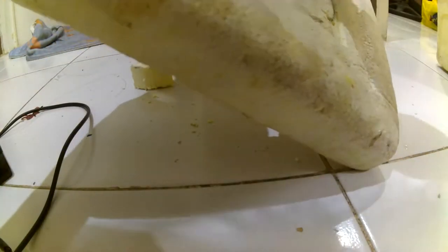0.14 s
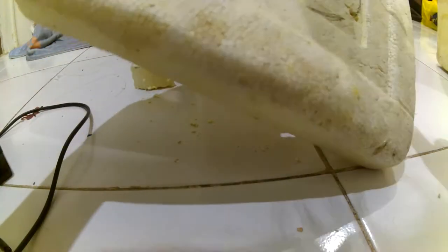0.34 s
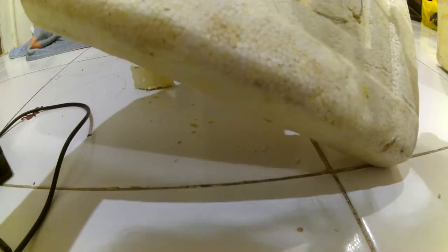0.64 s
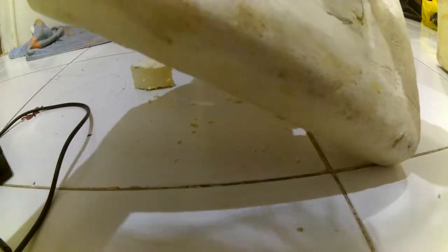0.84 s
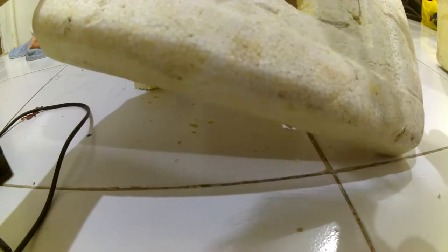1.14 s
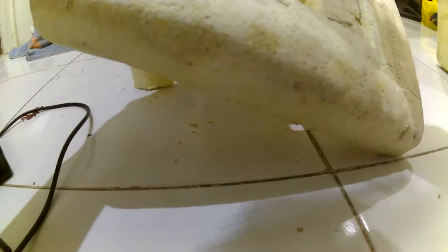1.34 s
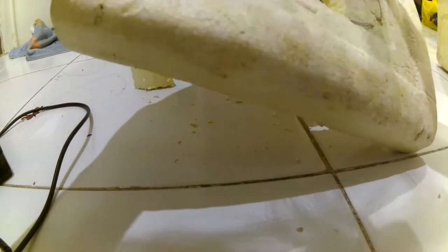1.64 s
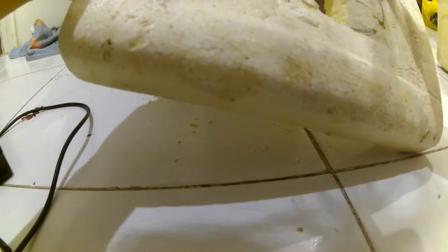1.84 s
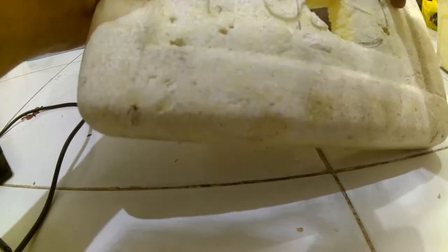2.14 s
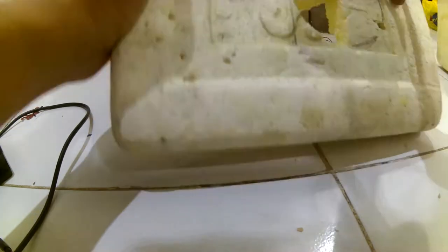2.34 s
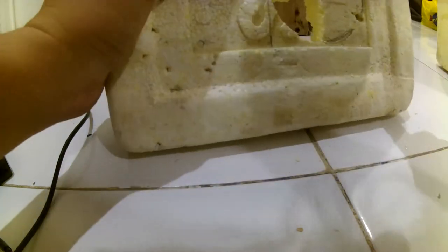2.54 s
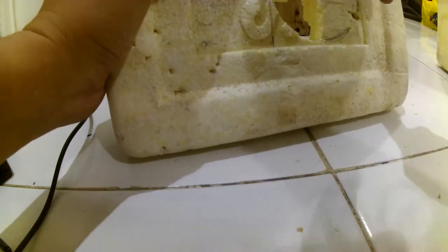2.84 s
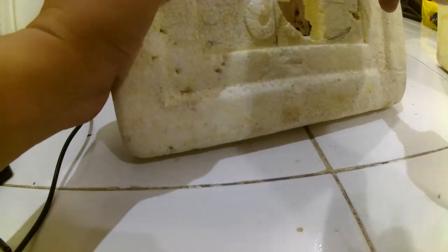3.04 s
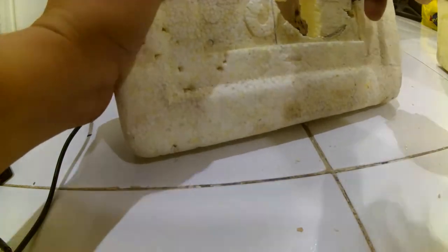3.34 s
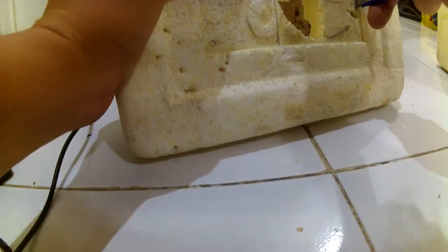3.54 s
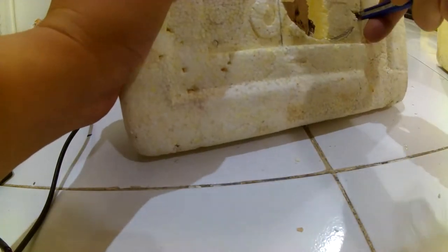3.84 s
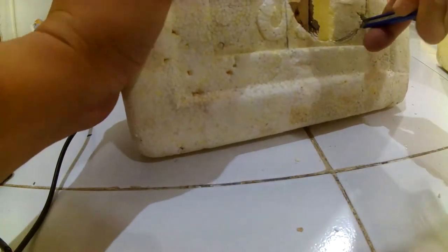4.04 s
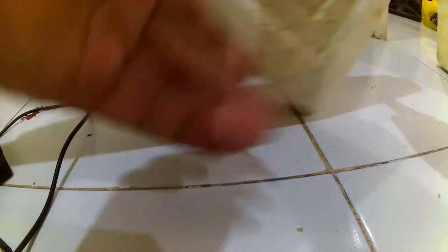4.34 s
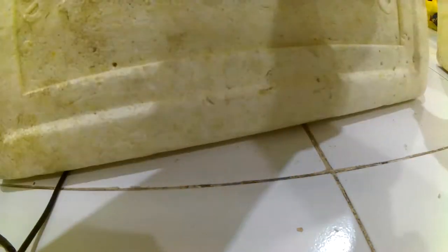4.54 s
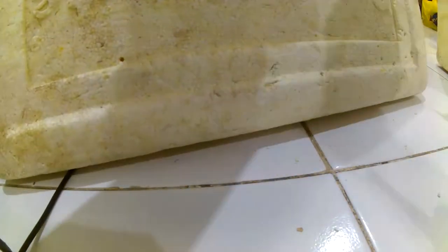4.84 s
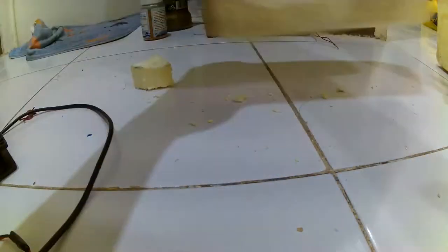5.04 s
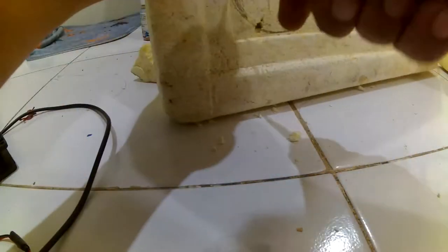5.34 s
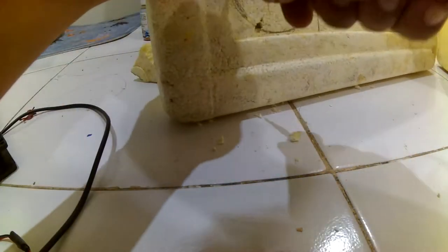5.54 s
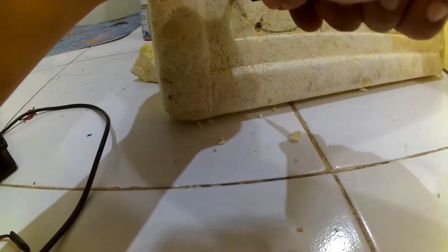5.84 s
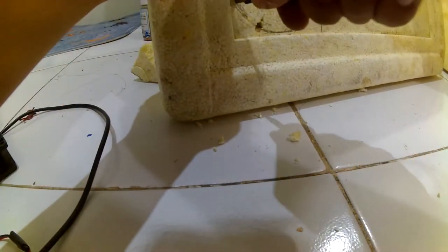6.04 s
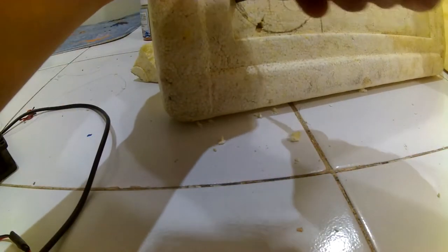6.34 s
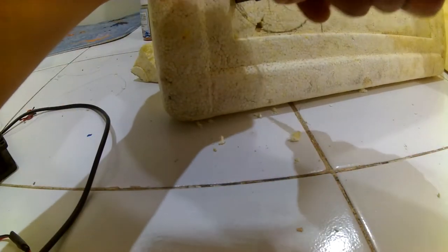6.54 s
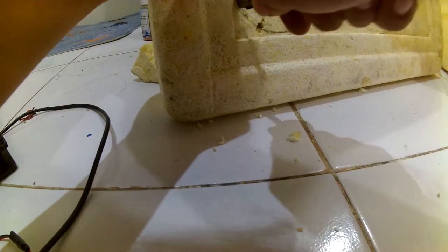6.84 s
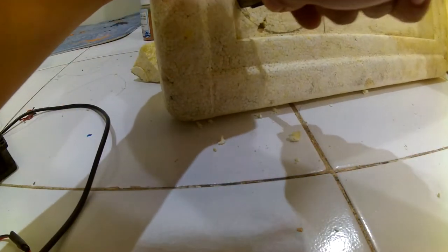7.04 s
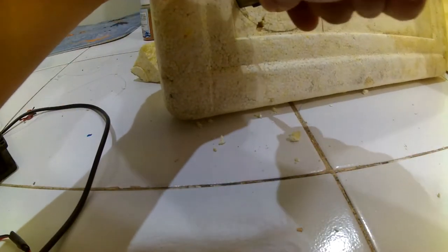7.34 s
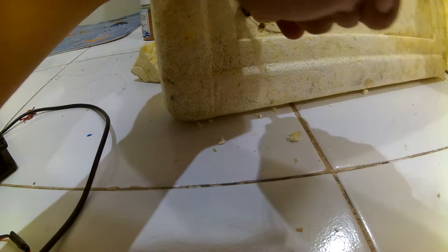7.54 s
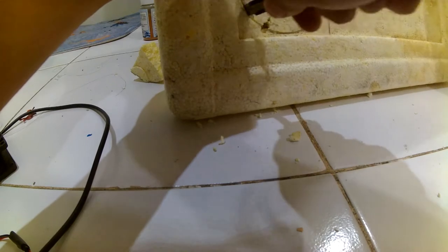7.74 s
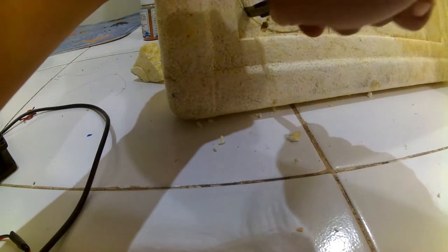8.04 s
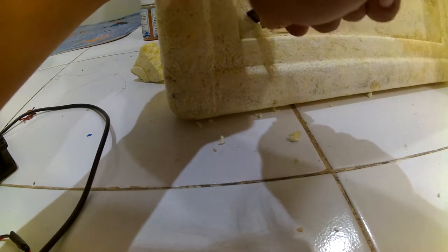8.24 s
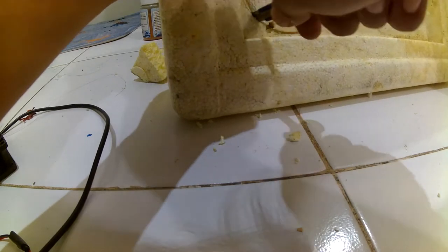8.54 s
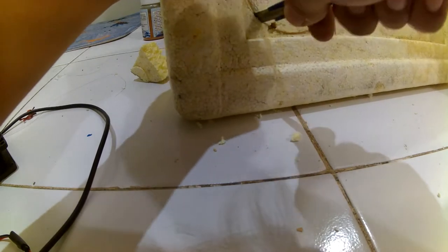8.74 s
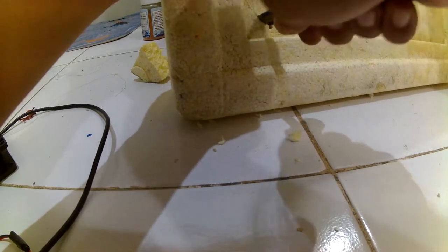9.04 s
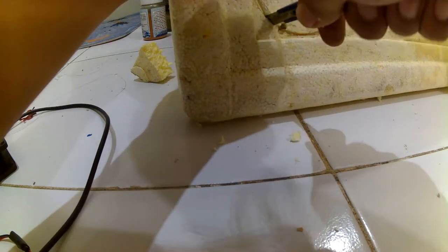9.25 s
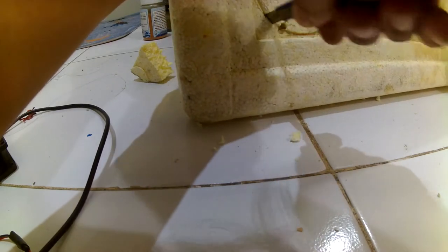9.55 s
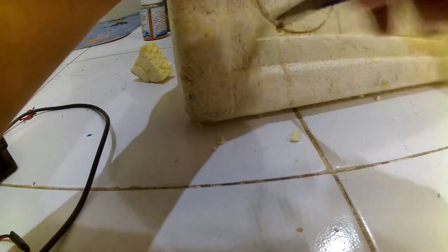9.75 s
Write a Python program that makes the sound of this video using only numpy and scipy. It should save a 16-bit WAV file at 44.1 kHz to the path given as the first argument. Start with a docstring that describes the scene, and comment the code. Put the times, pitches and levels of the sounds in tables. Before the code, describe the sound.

A knife picks and scrapes at a foam lid with dry snaps, squeaks and knocks, then saws in long, droning, raspy strokes.

```python
"""A knife blade cuts a polystyrene box lid on a tiled floor, close by. First it picks at the foam: bursts of noise
are snapping beads, dense grains are short scrapes, wavering partials are thin squeaks, and struck resonances
are knocks as the lid is turned. From 5.82 s it saws in long strokes that drive the lid's resonances, so that it
drones, rumbles and thumps. Behind the picking lie light rubbing, room tone and a faint cricket; behind the
sawing, a shuddering lid over a soft hiss."""
import sys
import numpy as np
from scipy import signal
from scipy.fft import rfft, irfft, next_fast_len
from scipy.io import wavfile

SR = 44100
rng = np.random.default_rng(int(sys.argv[2]) if len(sys.argv) > 2 else 0)


def unload_audio(sound):
    """Save the sound as a 16-bit wav file, at the path given as the first command line argument."""
    columns = np.transpose(np.atleast_2d(sound))
    # keep every value between -1 and 1, then stretch to whole-number steps
    steps = np.round(np.clip(columns, -1, 1) * 32767)
    wavfile.write(sys.argv[1], SR, steps.astype(np.int16))


N = 437031
TIME = np.arange(N) / SR
SAWING_FROM_S = 5.82


# loudest beads of foam to snap [t/s, level/dB, treble tilt against mids/dB]
BEAD_SNAPS = [(0.025, -22.5, 16), (0.0621, -11, 7.5), (0.099, -28.5, -10), (0.195, -27, 1),
              (0.2036, -19.5, 3), (0.2671, -4.5, -8.5), (0.2723, -15, -4), (0.699, -28, -11),
              (0.7167, -27, -12), (0.7866, -13.5, 6), (0.872, -26, 8), (1.173, -32, 13), (1.245, -34, 5),
              (1.3305, -24.5, -3.5), (1.4246, -10, 29), (1.494, -13, 62), (1.6049, -22.5, 0),
              (1.612, -23.5, -1), (1.7315, -27.5, -17), (1.7901, -23, -3), (1.9307, -11.5, 12),
              (2.0066, -27.5, -5), (2.012, -26, 1), (2.0148, -24.5, 7), (2.171, -31, -14),
              (2.2407, -26, 25), (2.3165, -21.5, 54), (2.3226, -27, 43), (2.4482, -24, 5),
              (2.6186, -25.5, -15), (2.648, -25, -4), (2.702, -30, -13), (2.737, -27.5, -4),
              (2.8777, -34, -11), (2.895, -15, -1), (2.904, -23, -3), (2.9293, -25, 0),
              (2.9885, -11.5, 1.5), (3.0674, -24, 7), (3.1215, -26, -7), (3.2497, -21.5, 1.5),
              (3.2615, -30, 6), (3.4195, -21.5, -2), (3.4436, -27, 4), (3.4649, -17, 3), (3.573, -27, 6),
              (3.647, -24.5, 1), (3.789, -32, 9), (3.9669, -25, 2), (4.0299, -19, 5), (4.035, -16.5, 11),
              (4.066, -25.5, -7), (4.104, -32, 11), (4.1186, -9.5, 12.5), (4.161, -26, 6),
              (4.239, -13.5, 1.5), (4.4012, -9, 40), (4.4235, -23, 10), (4.7396, -13, 25),
              (4.7705, -16, 46), (4.7753, -14.5, -11), (4.7951, -26.5, -22), (4.856, -29, 10),
              (4.8756, -32, -2), (5.0115, -33, -9), (5.1718, -12.5, 16), (5.567, -30, -14), (5.707, -42, 0),
              (5.7235, -10.5, 3.5), (8.0565, -19.5, 2), (9.049, -30.5, -11), (9.6915, -22, 23),
              (9.6985, -27, -3), (9.8895, -22.5, -27)]
# tone of a breaking bead [f/Hz, gain/dB]
SNAP_COLOUR = [(59, -56), (100, -12.5), (424, -4), (1030, 9.5), (2040, 7.5), (2470, 0), (2990, 6),
               (3620, -5.5), (4290, 0.5), (6290, -12), (7140, -10), (9020, -16), (12400, -17), (15000, -22),
               (16000, -10)]


def snaps(tail_s=0.0073, tail_db=-19, rise_db=-21):
    """A snap has a faint noisy rise, bursts for about a millisecond, then a short tail."""
    out = np.zeros(N)
    lead, burst_s, rise_s = 256, 0.0007, 0.0014  # lead: samples of rise before the burst
    t = np.arange(-lead, 2048) / SR
    before = amp(rise_db) * np.exp(-np.abs(t) / rise_s)
    after = np.exp(-np.abs(t) / burst_s) + amp(tail_db) * np.exp(-np.abs(t) / tail_s)
    for start, db, bright_db in list(BEAD_SNAPS) + small_snaps():
        burst = rng.standard_normal(len(t)) * np.where(t < 0, before, after)
        burst[lead] += 3 * rng.choice([-1, 1])  # the click of the break itself
        sound = colour(burst, SNAP_COLOUR, bright_db)
        first_3_ms = sound[lead:lead + 130]
        add(out, start + t[0], sound / np.std(first_3_ms) * amp(db))
    return out


# short pushes of the blade [start t/s, end t/s, level before trim and arch/dB, treble tilt before treble_db/dB]
PUSHES = [(0.122, 0.162, -36, 8), (0.236, 0.274, -28.5, 9), (0.611, 0.621, -38.5, -6),
          (0.644, 0.659, -37.5, 1), (0.735, 0.747, -30.5, 3), (0.905, 0.937, -27.5, 12),
          (1.214, 1.265, -42, -1), (1.464, 1.494, -34.5, 6), (1.539, 1.548, -24.5, 0),
          (1.731, 1.758, -31.5, 7), (1.815, 1.839, -38, 5), (1.954, 1.965, -24, 3.5),
          (2.032, 2.048, -40, 4), (2.19, 2.211, -31, 2.5), (2.413, 2.454, -31.5, -5),
          (2.671, 2.677, -27.5, 4), (2.693, 2.704, -26, 2), (2.756, 2.789, -28.0, 5),
          (2.833, 2.906, -28.5, 1), (2.924, 2.941, -32, 2), (2.977, 2.989, -27, -2), (3.012, 3.023, -21, 9),
          (3.147, 3.173, -22, 5), (3.179, 3.202, -29, 4), (3.279, 3.321, -31, 3), (3.368, 3.421, -28, 8.5),
          (3.473, 3.502, -29.5, 9), (3.567, 3.605, -27.0, 7), (3.661, 3.68, -26.5, 9),
          (3.728, 3.753, -23.5, 10.5), (3.805, 3.822, -27.5, 6), (3.875, 3.899, -26, 8),
          (3.947, 4.003, -34, 12), (4.02, 4.036, -33.5, 1), (4.049, 4.079, -30.5, 7),
          (4.216, 4.236, -21.5, 10), (4.271, 4.279, -33, -5), (4.322, 4.342, -32, 2),
          (4.558, 4.577, -29.5, 5), (4.672, 4.689, -29.5, -5.5), (4.711, 4.714, -27, 5),
          (4.771, 4.775, -24.5, 11), (5.302, 5.309, -34.5, -2), (5.511, 5.528, -29.5, 13),
          (5.55, 5.579, -35.5, 7), (5.605, 5.625, -29, 20), (5.657, 5.701, -29, 8), (5.709, 5.725, -31, -4),
          (5.763, 5.773, -36, 3), (5.795, 5.819, -36, 4), (9.732, 9.734, -24.5, 1),
          (9.801, 9.803, -21.5, 10), (9.861, 9.867, -30, 10)]
# tone of tearing cell walls [f/Hz, gain/dB]
SCRAPE_COLOUR = [(88, -38), (150, -18), (649, -1.5), (1020, 7), (1350, 3), (1630, 0), (1900, 0.5),
                 (2500, -4.5), (2920, 4), (3220, -0.5), (5150, -6), (6200, -2.5), (7100, -0.5), (8700, -6),
                 (9650, -11), (10600, -8), (13400, -8.5), (14700, -20), (16000, -9)]


def scrapes(rise_s=0.015, fall_s=0.0058, judder_db=1.44, arch_db=6, peak_share=0.78, trim_db=-0.5, treble_db=1.5):
    """Each push tears a dense run of cell walls, swelling as the blade gathers speed."""
    out = np.zeros(N)
    for start, end, db, bright_db in PUSHES:
        speed = swell(start, end, rise_s, fall_s)
        n = len(speed)
        tearing = scatter(grains(n, rate=9000, scatter_db=1.0), decay_s=0.0031)
        tearing = tearing * amp(judder_db * walk(n, rate=376))
        sound = unit(colour(tearing, SCRAPE_COLOUR, bright_db + treble_db))
        level = amp(db + trim_db + arch_db * arch(n, peak_share))
        add(out, start - rise_s / 4, sound * speed * level)
    return out


def small_snaps(count=3, reach_s=0.024, lead_db=-13.5, spread_db=2, bright_db=-2.5, bright_spread_db=8):
    """Each push loosens a few small beads that give way at random around it, louder for harder pushes."""
    rows = []
    for start, end, db, _ in PUSHES:
        times = rng.uniform(start - reach_s, end + reach_s, count)
        size, bright = rng.standard_normal((2, count))
        levels_db = db + lead_db + spread_db * size
        rows += zip(times, levels_db, bright_db + bright_spread_db * bright)
    return rows


# even stick-slip of the blade [start t/s, end t/s, first nominal f/Hz, last nominal f/Hz, level/dB,
# step per further partial/dB, mid-way rise of pitch/share]
STICK_SLIPS = [(0.915, 0.967, 1560, 1560, -37, -9, .22), (0.996, 1.063, 1510, 1490, -42, -2, .025),
               (1.114, 1.137, 1600, 1580, -45, -2, .015), (1.975, 2.01, 8100, 7850, -44, -40, 0),
               (3.68, 3.702, 2170, 2100, -37, 0, .01), (3.755, 3.79, 1890, 1870, -42, -4, 0),
               (3.798, 3.829, 1965, 1980, -37, -1, .02), (3.897, 3.944, 1620, 1900, -37.5, -7, .085),
               (4.005, 4.03, 1700, 1880, -40, -1, .02), (4.313, 4.398, 1300, 1340, -41, -8, 0),
               (4.877, 4.917, 8200, 8100, -46, -40, 0), (5.222, 5.334, 1780, 1980, -44.5, -1, .04),
               (5.425, 5.5, 7950, 7700, -48, -40, .02), (6.004, 6.152, 560, 560, -48, -20, -.05),
               (7.014, 7.12, 1750, 1720, -50, -19, 0), (7.08, 7.217, 1340, 1330, -45, -30, .015),
               (7.478, 7.606, 1310, 1410, -43, -24, .015), (9.19, 9.46, 668, 648, -45, -26, 0)]
# the blade favours partials near one resonance [f/Hz, gain/dB]
SQUEAK_COLOUR = [(2000, 4), (2700, 3), (3800, 10.5), (5200, -4), (8000, 7)]


def squeaks(loose_jitter=0.012, pressed_jitter=0.025, waver=0.008):
    """Regular stick-slip gives a thin, wavering stack of partials whose pitch follows the speed of the blade."""
    out = np.zeros(N)
    for start, end, first_hz, last_hz, db, fall_db, arch_share in STICK_SLIPS:
        speed = swell(start, end, rise=0.0099, fall=0.0053)
        n = len(speed)
        # under the weight of the saw the slips come less evenly, and the squeak turns into a creak
        jitter = pressed_jitter if start > SAWING_FROM_S else loose_jitter
        wobble = 1 + jitter * walk(n, rate=760) + waver * walk(n, rate=49.0)
        speed_bend = 1 + arch_share * np.sin(np.linspace(0, np.pi, n))
        hz = np.linspace(first_hz, last_hz, n) * wobble * speed_bend
        phase = 2 * np.pi * np.cumsum(hz) / SR
        tone = np.zeros(n)
        for k in range(5):
            partial_db = k * fall_db + np.interp((k + 1) * hz, *np.transpose(SQUEAK_COLOUR))
            flutter_db = 3.3 * walk(n, rate=86.0)
            tone += amp(partial_db + flutter_db) * np.sin((k + 1) * phase)
        add(out, start - 0.005, unit(tone) * speed * amp(db))
    return out


# long saw strokes; levels before trims, arches and bite
# [start t/s, end t/s, level of pressure on the lid/dB, level of blade speed/dB]
SAW_STROKES = [(5.821, 6, -31.5, -39), (6.155, 6.272, -30.5, -34), (6.456, 6.525, -41, -63),
               (6.515, 6.696, -29.5, -37), (6.897, 7.012, -32, -34.5), (7.05, 7.11, -44, -55),
               (7.258, 7.401, -26.5, -36), (7.495, 7.596, -40.5, -49.5), (7.584, 7.74, -31, -33.5),
               (7.934, 8.082, -27.5, -34.5), (8.176, 8.431, -38, -42), (8.449, 8.591, -39, -35),
               (8.622, 8.71, -35.5, -41.5), (8.78, 8.917, -30.5, -32.5), (8.961, 9.038, -33, -29),
               (9.035, 9.14, -38.5, -47.5), (9.438, 9.713, -35, -35), (9.783, 9.926, -35, -40)]
# resonances of the lid pressed down under the saw [f/Hz, width/Hz, level/dB]
PRESSED_MODES = [(45, 57, -37), (169, 44, 2), (225, 32, 0), (321.5, 73, 2.5), (452.4, 9.5, -2),
                 (542, 55, -6), (722, 177, 0), (1020, 65, -1), (1175, 106, 4), (1500, 140, -9),
                 (1940, 220, -8)]
# upper resonances of the blade in its cut [f/Hz, width/Hz, level/dB]
RASP_MODES = [(2180, 540, 1), (2680, 140, -0.5), (4070, 720, -1), (4700, 340, -12), (5040, 390, -2),
              (6040, 790, -8.5), (6890, 380, -5), (8700, 610, -14.5), (15000, 920, -10)]
# bare tearing of the cells [f/Hz, gain/dB]
CELL_COLOUR = [(500, -5), (2600, -3.5), (3250, -8), (4000, -5), (6200, 1), (9000, 2.5), (13000, 2),
               (14100, -2), (15000, 4), (16000, 1)]
# the hiss sinks and starts to sing as the cut moves along the lid [t/s, centre f/Hz, level of narrow resonance/dB]
HISS_CENTRE = [(5.8, 12000, -19), (7.7, 12200, -15), (8.299, 11900, -16), (8.5, 11000, 5), (9.5, 11160, 0)]


def sawing(rise_s=0.05, fall_s=0.08, drone_db=1.0, hiss_db=1.5, raw_db=-4, crack_db=-9, arch_db=4.5,
           hiss_arch_db=5, uneven_db=0.93, drift=0.0036, catch_db=0.73, growth_db_per_s=0.34):
    """A long stroke drives the lid's modes, rasps through the cells and hisses along the blade."""
    out = np.zeros(N)
    times, centres, rings = np.transpose(HISS_CENTRE)
    for start, end, lid_db, blade_db in SAW_STROKES:
        # the rasp needs both pressure and speed, and grows as the blade sinks deeper
        rasp_db = (lid_db + blade_db) / 2 + growth_db_per_s * (start - SAWING_FROM_S)
        hiss_hz = np.interp(start, times, centres)
        ring_db = np.interp(start, times, rings)
        speed = swell(start, end - fall_s / 4, rise_s, fall_s)
        n = len(speed)
        # the stroke is loudest about three quarters of the way through, and uneven from bead to bead
        sweep = arch(n, peak_share=0.76)
        bite = amp(arch_db * sweep + uneven_db * walk(n, rate=129.7))

        slips = scatter(grains(n, rate=5500, scatter_db=0.0), decay_s=0.0066)
        drone = colour(resonate(slips, PRESSED_MODES),
                       [(60, -26), (300, -9.5), (700, 1.0), (2200, -4.5), (3500, -15.5), (9000, -8.0)])

        cells = grains(n, rate=16000, scatter_db=0.5)
        # the free length of the blade differs from stroke to stroke
        length = 1 + drift * rng.standard_normal()
        blade_modes = [(hz / length, width, db) for hz, width, db in RASP_MODES]
        rasp = unit(resonate(scatter(cells, decay_s=0.0029), blade_modes))
        # single beads crack along the way
        cracks = colour(grains(n, rate=300, scatter_db=4), SNAP_COLOUR, bright_db=-3)
        rasp = rasp + amp(raw_db) * unit(colour(cells, CELL_COLOUR)) + amp(crack_db) * unit(cracks)

        # a narrow steel resonance stands on a broad hiss
        broad = colour(cells, [(3000, -51), (9500, -12.5), (10300, -5), (10900, -1.0), (12300, 1.5),
                               (13100, -2), (14200, -19), (16000, -31)])
        hiss = unit(broad) + amp(ring_db) * unit(resonate(cells, [(hiss_hz, 400, 0)]))

        # the edge catches and frees itself, which loads the foam more than the steel
        catch = amp(catch_db * walk(n, rate=39.7))
        foam = unit(drone) * amp(lid_db + drone_db) + unit(rasp) * amp(rasp_db)
        steel = unit(hiss) * amp(blade_db + hiss_db + hiss_arch_db * sweep)
        add(out, start - rise_s / 4, (foam * catch + steel) * speed * bite)
    return out


# the blade catches in its cut [t/s, peak level/dB, contact f/Hz]
BLADE_CATCHES = [(8.0553, -8, 4600), (9.029, -29, 3500), (9.889, -16, 3500)]


def catches(width_share=0.25):
    """Held still for a moment, the blade rings more narrowly than it rasps."""
    held = [(hz, width * width_share, db) for hz, width, db in RASP_MODES]
    return blows(BLADE_CATCHES, held, cycles=0.14, direct_db=-35, grit_db=-11, grit_hz=8000)


# the lid knocks as it is turned [t/s, peak level before the low cut/dB, contact f/Hz]
LID_KNOCKS = [(0.339, -18, 388), (0.939, -12.5, 720), (1.4287, -5, 1020), (2.469, -26, 445),
              (4.279, -32, 480), (4.308, -28, 1100), (4.334, -30, 1020), (4.353, -29, 500),
              (4.401, 9, 2000), (4.4118, -3.5, 1000), (4.426, -10, 990), (4.446, -10.5, 1030),
              (4.456, -14.5, 500), (4.4645, -15, 2700), (4.47, -16, 1000), (4.483, 1.5, 860),
              (4.494, -27, 1300), (4.751, -13.5, 1110), (4.7738, -12, 900), (4.876, -19.5, 1000),
              (4.901, -27, 900), (4.9755, -24.5, 1500), (4.986, -26, 497), (5.0709, -10, 1770),
              (5.077, -15.5, 2600), (5.088, -18.5, 1200), (5.154, -10.5, 2520), (5.159, 0, 1230),
              (5.162, -10.5, 910), (5.171, -17, 840), (5.2, -18, 900), (5.205, -14, 880)]
# resonances of the lid held loosely [f/Hz, width/Hz, level/dB]
LOOSE_MODES = [(283, 91, -7), (565, 690, -10), (990, 150, 3.5), (1320, 110, -7), (2206, 90, 0.5),
               (2730, 72, -23), (3550, 110, -5)]


def knocks(low_cut_hz=78):
    """Contacts ring the loose lid; the deepest bass is cut away."""
    contacts = list(LID_KNOCKS) + rebounds()
    x = blows(contacts, LOOSE_MODES, cycles=0.46, direct_db=-2.0, grit_db=-5.5, grit_hz=2520)
    return signal.lfilter(*signal.butter(1, low_cut_hz, "high", fs=SR), x)


def rebounds(delay_s=0.0075, drop_db=-12.5, db_per_octave=13.5, pitch_share=0.6, sharp_hz=2100):
    """Each knock rebounds once, softer and duller; sharp contacts rebound most."""
    rows = []
    for start, db, hz in LID_KNOCKS:
        rebound_db = db + drop_db + db_per_octave * np.log2(hz / sharp_hz)
        rows.append((start + delay_s, rebound_db, hz * pitch_share))
    return rows


# the lid bumps under the saw [t/s, peak level/dB, contact f/Hz, level of the shudder that follows/dB]
LID_THUMPS = [(6.099, -29, 170, -32), (6.35, -34, 160, -37), (6.378, -30, 374, -41),
              (6.623, -17, 402, -27.5), (6.814, -16.5, 760, -26), (7.254, -19.5, 254, -30),
              (7.485, -33, 268, -28.5), (7.498, -32, 159, -50), (8.0549, -7.5, 418, -24),
              (8.059, -16, 325, -21.5), (8.054, -0.5, 1290, -38), (8.164, -29, 905, -37),
              (8.782, -22, 1090, -28), (8.837, -23, 217, -26.5), (8.913, -16, 634, -31),
              (8.96, -25, 400, -25), (9.028, -13, 1360, -22.5), (9.086, -28, 50, -22),
              (9.091, -8, 223, -22), (9.326, -21, 1300, -35.5), (9.388, -31, 1520, -28.5),
              (9.817, -22, 140, -33.5), (9.865, -20, 1100, -31), (9.889, -15, 1310, -25),
              (9.893, -18.5, 138, -28)]


def thumps():
    """Bumps under the saw ring the pressed lid."""
    return blows(LID_THUMPS, PRESSED_MODES, cycles=0.53, direct_db=-9.5, grit_db=-12, grit_hz=1130, grit_ratio=2.0)


def jolts(rise_s=0.0027, decay_s=0.033, reference_hz=200, decay_power=0.38, top_ratio=1.67, raw_db=-6):
    """After each bump the lid shakes to a little above the contact's pitch; low shudders last longest."""
    out = np.zeros(N)
    t = np.arange(SR // 2) / SR
    for start, _, hz, db in LID_THUMPS:
        slips = grains(len(t), rate=2500, scatter_db=-1.0)
        shake = resonate(slips, PRESSED_MODES) + amp(raw_db) * slips
        top_hz = min(hz * top_ratio, SR / 4)
        shake = signal.lfilter(*signal.butter(2, top_hz, fs=SR), shake)
        fade_s = decay_s * (reference_hz / hz) ** decay_power
        envelope = np.minimum(t / rise_s, 1) * np.exp(-t / fade_s)
        add(out, start, unit(shake) * envelope * amp(db))
    return out


# the knife is jarred [t/s, peak level/dB, contact f/Hz]
KNIFE_CLINKS = [(4.335, -32, 2400), (4.401, -12, 1990), (4.425, -23, 2400), (5.077, -20, 2980),
                (5.172, -11, 5000), (5.2, -24, 2300), (9.392, -36, 2600)]
# resonances of the knife [f/Hz, width/Hz, level/dB]
KNIFE_MODES = [(2237, 40, 4), (2780, 60, -1.5), (4145, 54, -13), (5540, 85, -17), (6955, 110, 3),
               (8700, 70, -9)]


def clinks():
    """Jarring contacts ring the knife's own modes."""
    return blows(KNIFE_CLINKS, KNIFE_MODES, cycles=0.28, direct_db=-35, grit_db=-14, grit_hz=8000)


# soft hiss under the sawing [f/Hz, gain/dB]
SAW_BED_COLOUR = [(25, -6), (100, -16.5), (700, -16.5), (1500, -14.5), (3200, -32), (4150, -27.5),
                  (5500, -35.5), (6300, -32.5), (8200, -36), (10500, -24), (12600, -24), (14200, -36),
                  (15100, -38), (16000, -45)]


def shudder(rumble_db=-45, murmur_db=-47, stroke_rumble_db=-11, stroke_murmur_db=-5, unsteady_db=1.5, bed_db=-47):
    """The pressed lid creaks and rumbles against the tiles over a soft hiss, more under each stroke."""
    body = resonate(grains(N, rate=900, scatter_db=0.0), PRESSED_MODES)
    stroke = pressure()
    grip = amp(unsteady_db * walk(N, rate=16))
    rumble = unit(colour(body, [(30, -13.0), (130, 6.0), (380, 6.5), (700, -10.5), (3000, -63)]))
    murmur = unit(colour(body, [(200, -20.5), (500, 9.0), (1000, -5.5), (1500, -4), (3000, -9.5), (9000, -4)]))
    # hypot adds the steady and the stroke-driven part by power
    rumble = rumble * np.hypot(amp(rumble_db), amp(stroke_rumble_db) * stroke)
    murmur = murmur * np.hypot(amp(murmur_db), amp(stroke_murmur_db) * stroke)
    bed = amp(bed_db) * unit(colour(rng.standard_normal(N), SAW_BED_COLOUR))
    return (rumble + murmur) * grip + jolts() + bed


def pressure(rise_s=0.066, fall_s=0.15):
    """How hard the saw strokes bear on the lid, through time."""
    out = np.zeros(N)
    for start, end, lid_db, _ in SAW_STROKES:
        add(out, start - rise_s / 4, swell(start, end, rise_s, fall_s) * amp(lid_db))
    return out


# light rubbing between the pushes, shared gain of its three layers [t/s, level/dB]
RUB_LEVEL = [(0.0, -43.5), (0.4, -43.5), (0.8, -42.5), (1.9, -42), (2.3, -41), (3.75, -42.5), (4.05, -35.5),
             (4.33, -37.5), (4.55, -43), (4.8, -43.5), (5.1, -37.5), (5.8, -44)]


def rubbing(rub_db=-8.0, tick_db=-10.0, patchy_db=4.5, crumble_db=-6, cluster_db=6):
    """The resting blade whispers on the foam in patches; single cells tick, and crumble in fine clusters."""
    whisper = unit(colour(grains(N, rate=8300, scatter_db=2.5), SCRAPE_COLOUR))
    patches = amp(patchy_db * walk(N, rate=41))
    ticks = unit(colour(grains(N, rate=190, scatter_db=2.5), SNAP_COLOUR, bright_db=0))
    clusters = grains(N, rate=830, scatter_db=0.5) * amp(cluster_db * walk(N, rate=60))
    crumbs = unit(colour(clusters, SCRAPE_COLOUR, bright_db=10))
    layers = amp(rub_db) * whisper * patches + amp(tick_db) * ticks + amp(crumble_db) * crumbs
    return layers * amp(curve(RUB_LEVEL, axis=1))


def cricket(level_db=-49.0):
    """A faint cricket chirps somewhere in the house, its pitch blurred by the walls."""
    hz, blur_hz, period_s, peak_at_s = 3530, 26, 0.376, 0.175
    lingering = 0.15  # share of the tone that stays between chirps
    pulse = np.cos(np.pi * (TIME - peak_at_s) / period_s) ** 2
    chirps = (lingering + (1 - lingering) * pulse) * amp(1.5 * walk(N, rate=30))
    phase = 2 * np.pi * np.cumsum(hz + blur_hz * walk(N, rate=200)) / SR
    return np.sin(phase) * chirps * amp(level_db)


# soft hiss of the room [f/Hz, gain/dB]
AIR_COLOUR = [(25, -36), (100, -5.5), (300, -4.5), (600, -8), (820, 1), (950, -12), (1350, -2), (2500, -11),
              (3100, -7.5), (4500, -18), (8000, -14.5), (16000, -18)]


def room_tone(air_db=-47, hum_db=-63.5, hum_hz=69):
    """Drifting filtered noise makes a soft hiss, and a wavering sine a low hum."""
    drift = amp(1.2 * walk(N, rate=12))
    air = unit(colour(rng.standard_normal(N), AIR_COLOUR)) * amp(air_db) * drift
    hum = np.sqrt(2) * np.sin(2 * np.pi * hum_hz * TIME)
    return air + hum * amp(hum_db + 2.0 * walk(N, rate=3.47))


def tiles(x, decay_s=0.013, wet_db=-19):
    """Faint, short reflections from the floor and walls: decaying noise after a 2 ms gap."""
    t = np.arange(8192) / SR
    echo = rng.standard_normal(len(t)) * np.exp(-t / decay_s) * (t > 0.002)
    return x + amp(wet_db) * signal.fftconvolve(x, echo / np.linalg.norm(echo))[:N]


def scatter(x, decay_s):
    """Many brief echoes inside the foam comb the direct sound; the comb shifts as the blade travels."""
    t = np.arange(1500) / SR
    paths = rng.standard_normal((2, len(t))) * np.exp(-t / decay_s)
    first, last = (signal.fftconvolve(x, path / np.linalg.norm(path))[:len(x)] for path in paths)
    travel = np.linspace(0, np.pi, len(x))
    return x + np.cos(travel) * first + np.sin(travel) * last


def blows(table, modes, cycles, direct_db, grit_db, grit_hz, grit_ratio=3, place_db=4.0):
    """Each contact is a short, gritty push that rings the modes, in a mix that depends on where it lands."""
    out = np.zeros(N)
    t = np.arange(6000) / SR
    for start, db, hz, *_ in table:
        grit_filter = signal.butter(2, min(grit_hz, grit_ratio * hz), fs=SR)
        grit = unit(signal.lfilter(*grit_filter, rng.standard_normal(len(t))))
        age = t * hz / cycles
        push = age * np.exp(1 - age) * (np.sin(2 * np.pi * hz * t) + amp(grit_db) * grit)
        struck = [(f, width, mode_db + place_db * rng.standard_normal()) for f, width, mode_db in modes]
        sound = resonate(push, struck) + amp(direct_db) * push
        add(out, start, sound / np.max(np.abs(sound)) * amp(db))
    return out


def grains(n, rate, scatter_db):
    """Tiny slips at random moments (rate per second) and of uneven size."""
    slips = rng.random(n) < rate / SR
    return slips * rng.standard_normal(n) * amp(scatter_db * rng.standard_normal(n))


def resonate(x, modes):
    """Sum of parallel resonances (Hz, width Hz, dB)."""
    out = 0
    for hz, width, db in modes:
        peak = signal.iirpeak(min(hz, SR / 2 - 1), hz / width, fs=SR)
        out = out + amp(db) * signal.lfilter(*peak, x)
    return out


def colour(x, points, bright_db=None):
    """Causal minimum-phase filter through (Hz, dB) points; a shelf can tilt the treble against the mids."""
    size = 2 * next_fast_len(len(x) // 2 + 1024)
    hz = np.maximum(np.fft.rfftfreq(size, 1 / SR), 1)
    knots, db = np.transpose(points)
    gain = amp(np.interp(np.log(hz), np.log(knots), db))
    if bright_db is not None:
        treble = np.sum(gain[(hz > 5000) & (hz < 16000)] ** 2)
        mids = np.sum(gain[(hz > 500) & (hz < 2500)] ** 2)
        lead_db = 10 * np.log10(treble / mids)
        shelf = np.interp(np.log(hz), np.log([1600, 7000]), [0, 1])
        gain = gain * amp((bright_db - lead_db) * shelf)
    # folding the cepstrum forward in time gives the minimum phase
    cepstrum = irfft(np.log(gain))
    cepstrum[1:size // 2] *= 2
    cepstrum[size // 2 + 1:] = 0
    return irfft(rfft(x, size) * np.exp(rfft(cepstrum)))[:len(x)]


def swell(start, end, rise, fall):
    """Blade speed over one movement: soft ramps that straddle its start and end."""
    t = np.arange(int((end - start + (rise + fall) / 2) * SR)) / SR
    ramp_up = np.sin(np.pi / 2 * np.clip(t / rise, 0, 1)) ** 2
    ramp_down = np.sin(np.pi / 2 * np.clip((t[-1] - t) / fall, 0, 1)) ** 2
    return ramp_up * ramp_down


def arch(n, peak_share):
    """Rises from -1 to 0 at a share of the movement and falls back to -1."""
    peak = np.clip(peak_share, 0.1, 0.9)
    angle = np.interp(np.linspace(0, 1, n), [0, peak, 1], [0, np.pi / 2, np.pi])
    return np.sin(angle) - 1


def walk(n, rate):
    """Random wander of spread 1, in straight lines between rate points per second."""
    step = SR / rate
    points = n // 16 + 2
    line = np.interp(np.arange(n) / step, np.arange(points), rng.standard_normal(points))
    return line * np.sqrt(1.5)  # makes up for the spread lost between points


def curve(table, axis):
    """One column of a table as a line through time."""
    rows = np.array(table)
    return np.interp(TIME, rows[:, 0], rows[:, axis])


def amp(db):
    """Decibels to linear gain."""
    return 10 ** (np.asarray(db) / 20)


def unit(x):
    """Scale to rms 1."""
    return x / np.sqrt(np.mean(x ** 2) + 1e-18)


def add(out, start_s, x):
    """Mix x into out from a given time."""
    i = max(int(start_s * SR), 0)
    out[i:i + len(x)] += x[:max(len(out) - i, 0)]


def scene():
    """Cutting and contacts with reflections, over one background while picking and another while sawing."""
    pressed = np.clip((TIME - SAWING_FROM_S) / 0.0093, 0, 1)  # 9.3 ms crossfade
    cutting = snaps() + scrapes() + squeaks() + sawing() + catches()
    contacts = knocks() + thumps() + clinks()
    picking_bed = rubbing() + cricket() + room_tone()
    mono = tiles(cutting + contacts) + (1 - pressed) * picking_bed + pressed * shudder()
    return np.array([mono, mono])


def record(dry, ceiling=0.72, top_hz=15750):
    """Round the loudest peaks, then cut steeply above the top frequency."""
    rounded = ceiling * np.tanh(dry / ceiling)
    return signal.sosfilt(signal.ellip(10, 0.2, 80, top_hz, fs=SR, output="sos"), rounded)


dry = scene()
out = record(dry)
unload_audio(out)
```